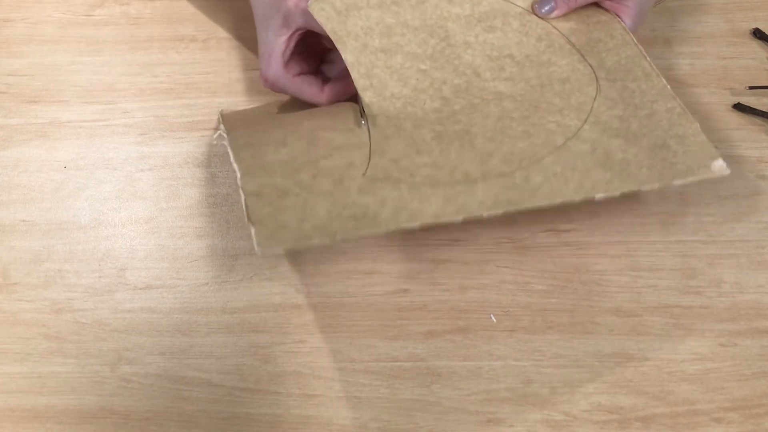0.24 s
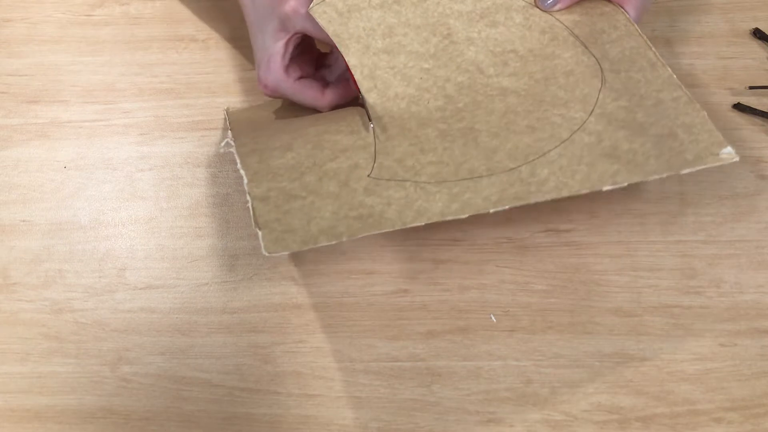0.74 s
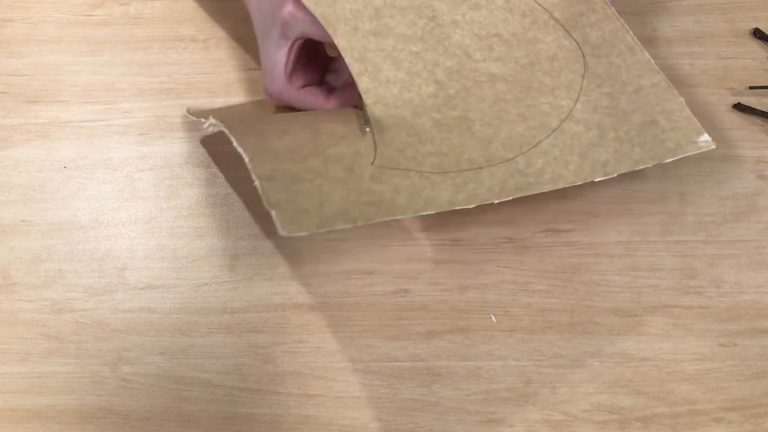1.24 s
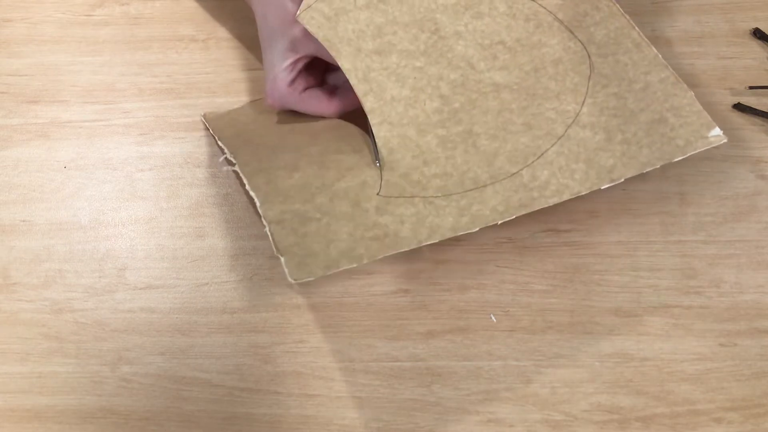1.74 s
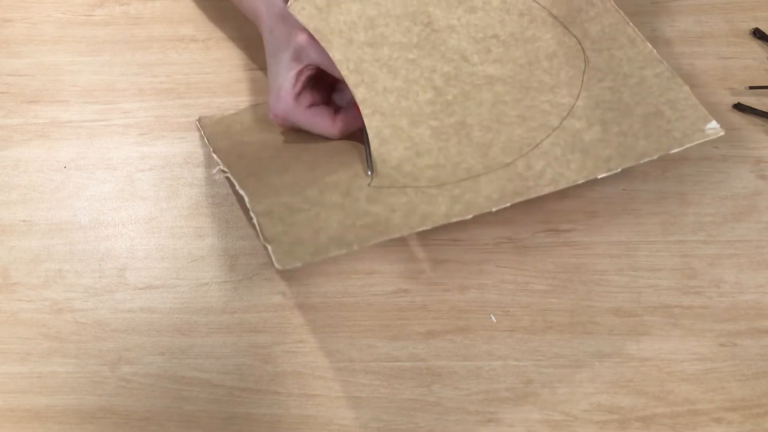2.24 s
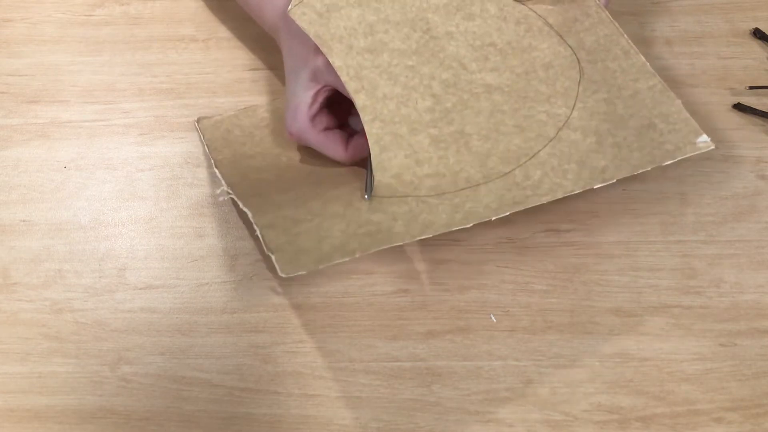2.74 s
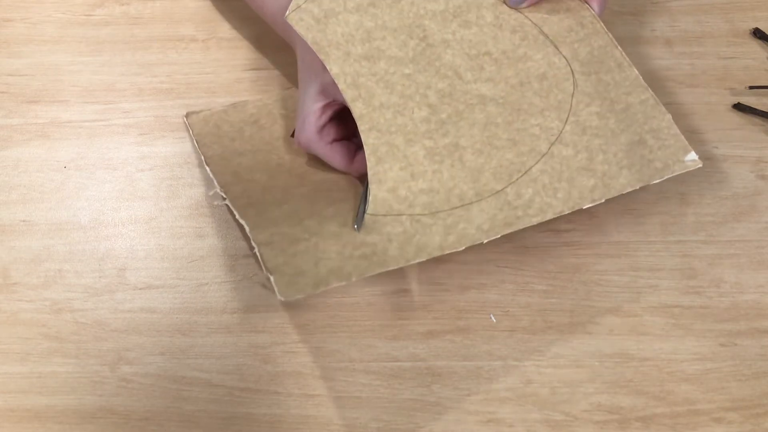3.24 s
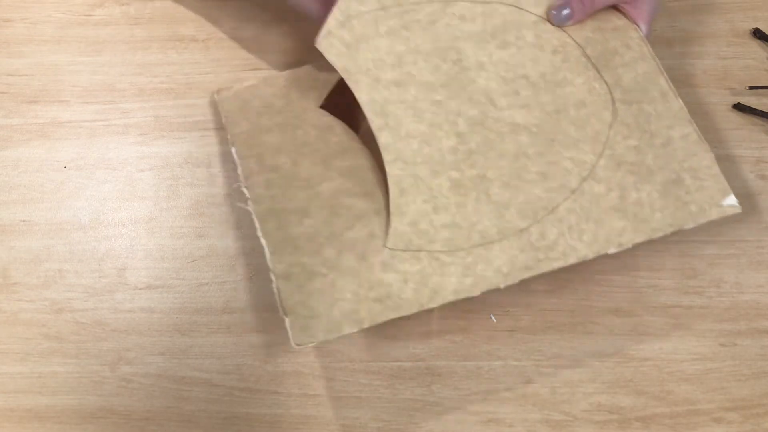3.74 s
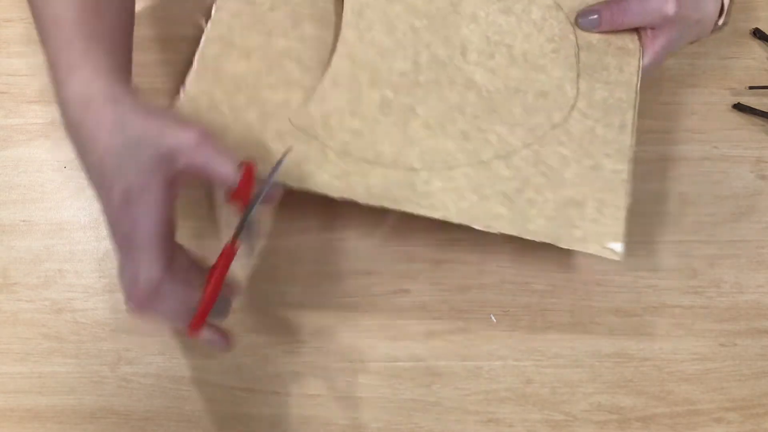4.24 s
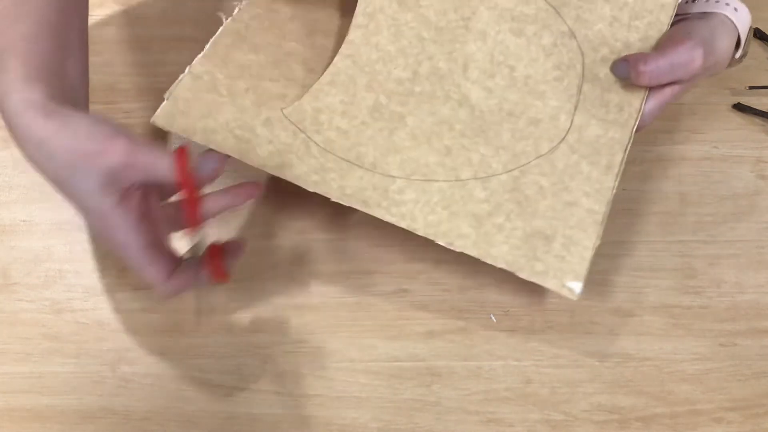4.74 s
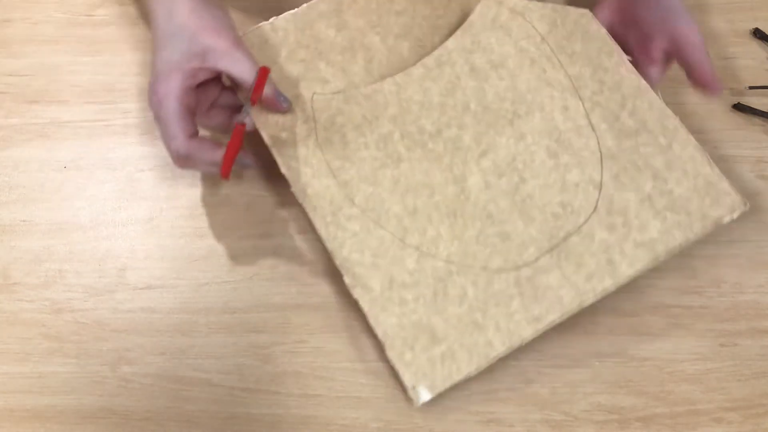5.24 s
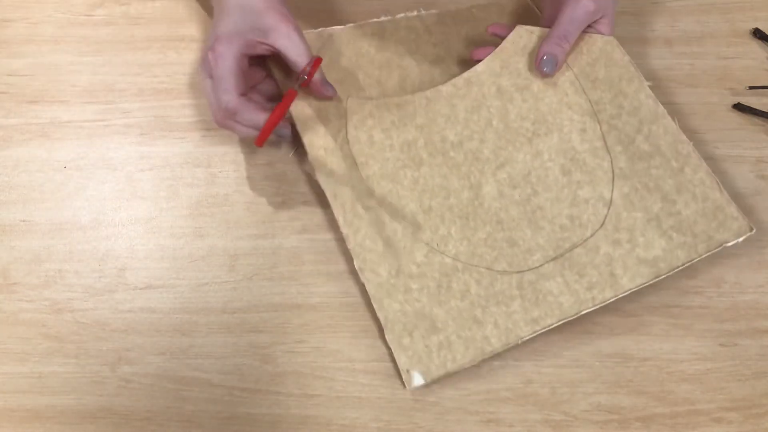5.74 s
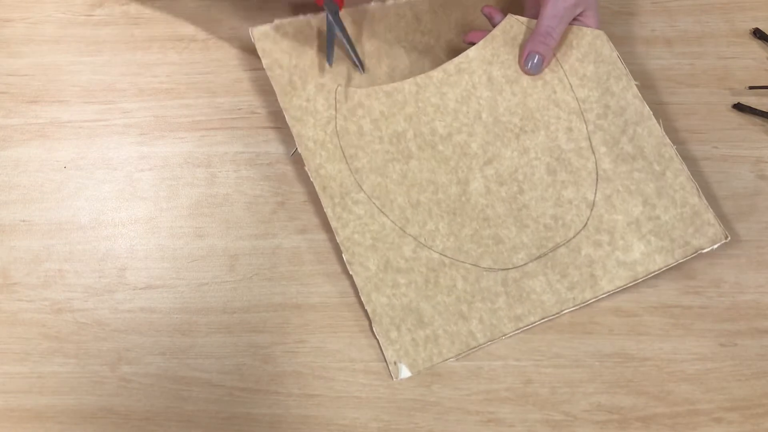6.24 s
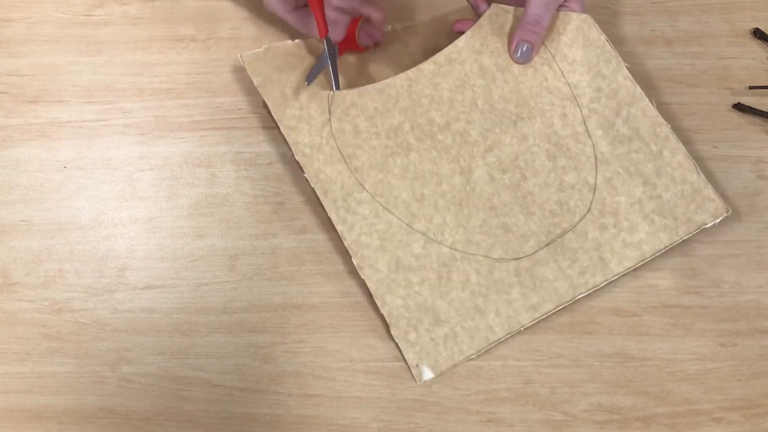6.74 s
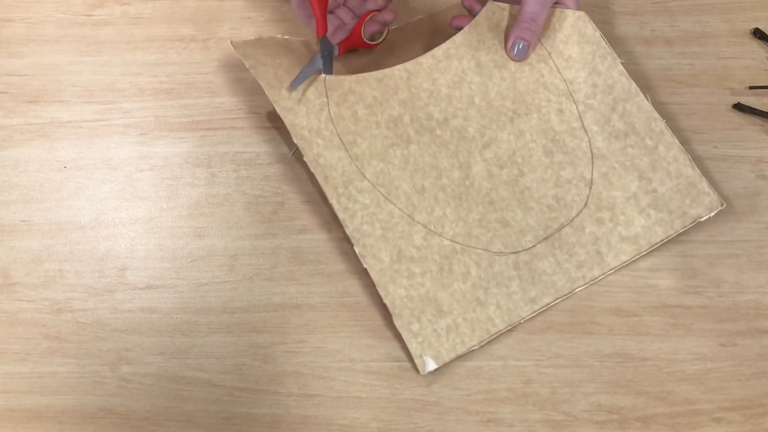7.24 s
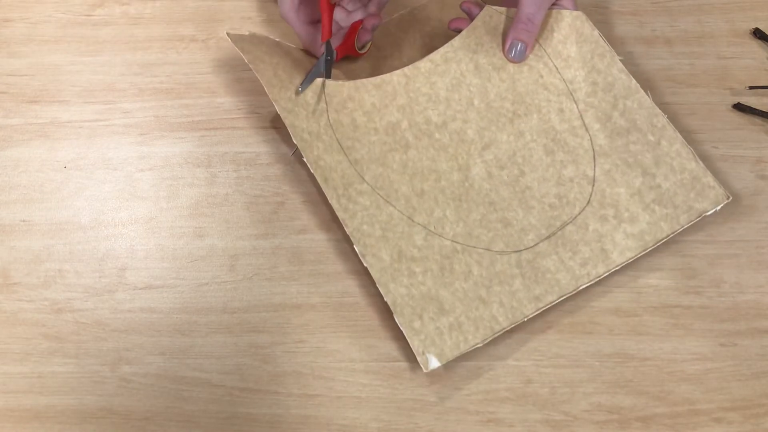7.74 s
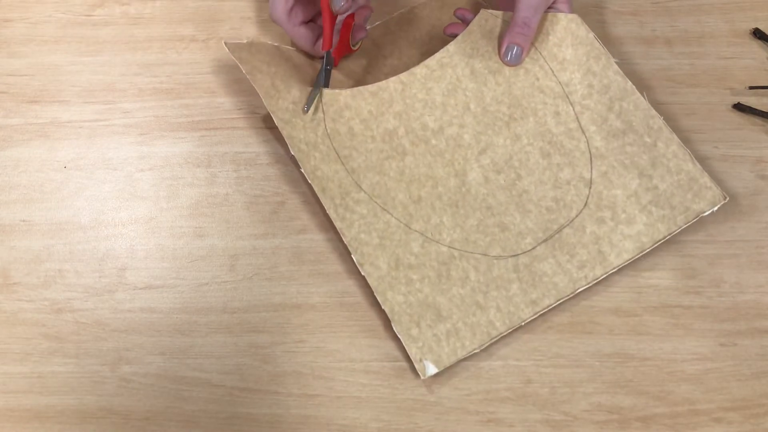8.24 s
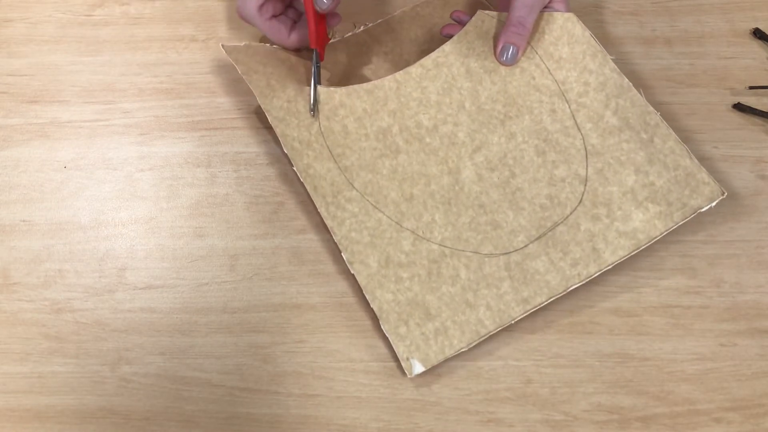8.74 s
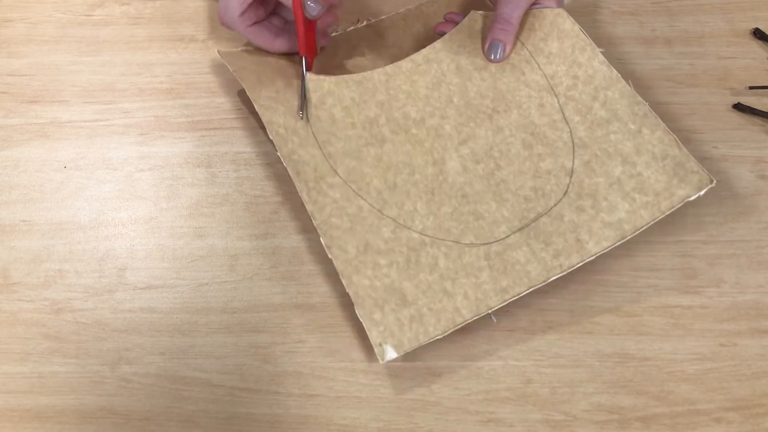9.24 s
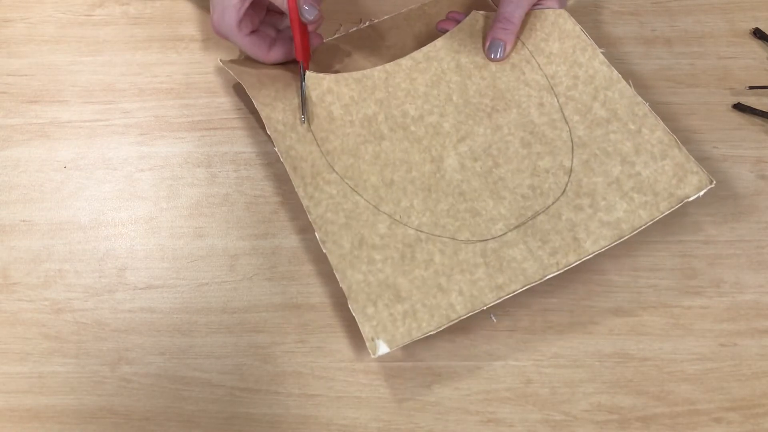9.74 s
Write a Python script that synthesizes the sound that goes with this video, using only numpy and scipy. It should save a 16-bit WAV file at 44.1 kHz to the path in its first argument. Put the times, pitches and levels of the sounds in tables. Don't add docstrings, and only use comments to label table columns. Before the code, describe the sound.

Small scissors crunch through thin cardboard in short crackling tears, with papery rubs, light taps and a brief squeak over faint ventilation rumble.

```python
import sys
import numpy as np
from scipy import signal
from scipy.fft import rfft, irfft, next_fast_len
from scipy.io import wavfile
from scipy.ndimage import uniform_filter1d

SR = 44100
rng = np.random.default_rng(int(sys.argv[2]) if len(sys.argv) > 2 else 0)


def put_to_file(sound):
    columns = np.atleast_2d(sound).T
    safe = np.clip(columns, -1, 1)
    whole_steps = np.round(safe * 32767)
    wavfile.write(sys.argv[1], SR, whole_steps.astype(np.int16))


def rack_gain(trim_db):
    fader = np.asarray(trim_db, float)
    return 10 ** (fader / 20)


N = 440118
SIZE = next_fast_len(N + SR // 2, True)
STEP = 32

# centre_hz, width_hz, level_db
FLAP_MODES = [(345, 64, -12), (447, 95, -7), (538, 186, -8.5)]
SHEET_MODES = [(695, 470, -6), (900, 280, 1), (1158, 520, -3.5), (1493, 330, -3.5)]
EDGE_MODES = [(1620, 660, 0), (2150, 524, -1.5), (2570, 350, -2.5), (3250, 1250, -5.5), (4200, 2040, -7)]
BLADE_MODES = [(5280, 390, -10), (7130, 1770, 5.5), (6700, 3700, 7), (10140, 2200, 2), (10850, 1000, 2.5),
               (13000, 19000, -0.5)]
# time_s, flap_db, ring_centre_hz, edge_tilt_db_per_octave
GRIP = [(0, 1.5, 880, 2), (1, 4, 914, -0.5), (1.6, 2, 762.5, 3), (2.3, 0, 870, 0.8), (3.12, 3.5, 841, 0),
        (3.3, 3.5, 1010, 0.5), (3.6, 1.5, 750, 1.5), (3.87, -2, 880, -1.5), (4.05, -7, 1153, 2),
        (5, 3.5, 1098, 3), (5.5, -15, 1250, 4.5), (6.3, -6.5, 1150, -2.5), (6.9, -9.5, 960, 0),
        (7.1, -8, 1000, -0.5), (7.3, -6, 1000, 4.5), (8.2, -8, 850, -4), (8.7, -5, 999, 1.5),
        (9.98, -12.5, 910, -1.5)]


def level(x, db):
    return x * rack_gain(db) / np.sqrt(np.mean(x ** 2))


def along(table, s):
    times, *columns = np.transpose(table)
    return [np.interp(s, times, column) for column in columns]


def held(control):
    return np.repeat(control, STEP)[:N]


def walk(rate_hz):
    hold = max(int(SR / STEP / rate_hz), 1)
    steps = np.repeat(rng.standard_normal(N // STEP // hold + 2), hold)
    return uniform_filter1d(uniform_filter1d(steps, hold), hold)[:N // STEP + 1]


def grit(shape, spread_db):
    return rng.standard_normal(shape) * rack_gain(spread_db * rng.exponential(size=shape))


def resonance(size, hz, width_hz):
    f = np.fft.rfftfreq(size, 1 / SR) + 1
    return 1 / (1 + 1j * (f - hz ** 2 / f) / width_hz)


def body(size, modes, shift=1, lean_db=0):
    lean_db = np.zeros(len(modes)) + lean_db
    total = 0
    for k, (hz, width_hz, db) in enumerate(modes):
        gain = (-1) ** k * rack_gain(db + lean_db[..., k:k + 1])
        total = total + gain * resonance(size, hz * shift, width_hz)
    return total


def skirts(size):
    return resonance(size, 2800, 4000), resonance(size, 8000, 13000)


def colour(x, response):
    size = 2 * response.shape[-1] - 2
    return irfft(rfft(x, size) * response, size)[..., :x.shape[-1]]


def tear_rows():
    # start_s, sheet_db, edge_over_sheet_db, length_ms
    blade_slips = [(.002, -35.5, -8, 4.8), (.024, -36.5, -5, 10), (.043, -32, -13.5, 8.3),
                   (0.048, -34, -8.5, 6.1), (.885, -40.5, -4.5, 17), (0.894, -46, -5, 16),
                   (.924, -35, -8.5, 4.1), (.935, -55, 9, 4), (.951, -32, -12, 5.7), (.963, -35.5, -5, 8.6),
                   (.999, -30.5, -9.5, 3.3), (1.027, -41, -2.5, 4.3), (1.082, -50.5, -7.5, 12),
                   (1.185, -49.5, -6, 11), (1.526, -40, -2, 6.7), (1.551, -36.5, -1.5, 6),
                   (1.568, -41, -4, 8.2), (1.589, -48, 4, 4.6), (1.604, -42.5, 3, 3.7),
                   (1.609, -35.5, -6.5, 4.3), (1.626, -38, -8, 6.7), (1.649, -32.5, -2.5, 6.3),
                   (1.67, -41.5, -6, 4.5), (1.69, -48, 3, 4.5),
                   (2.145, -46.5, -1, 4.9), (2.154, -40.5, -4, 5.5), (2.161, -43, -3.5, 4.8),
                   (2.179, -36.5, -4, 4.6), (2.186, -41, -1, 8), (2.198, -41, -8, 5.1),
                   (2.208, -38.5, -5.5, 10), (2.229, -42.5, -4, 6.4), (2.243, -54, 4, 2.8),
                   (2.253, -49.5, 6, 3.6), (2.284, -47, -1.5, 3), (2.601, -58, 5.5, 8.7),
                   (2.614, -42, -4, 9.6), (2.629, -44.5, 2, 11), (2.645, -44.5, 0, 7),
                   (2.654, -45, -0.5, 6.3), (2.664, -46, 0.5, 11), (2.678, -45, 0, 2.5),
                   (2.694, -37.5, -5.5, 8.8), (3.055, -55, 12, 8.9), (3.085, -50, 4, 4.3),
                   (3.1, -42.5, -2, 4.8), (3.126, -35.5, -1.5, 4.9), (3.134, -53, -4, 2.8),
                   (3.162, -39.5, -4.5, 4.1), (3.226, -46, 1, 3.4), (3.278, -30.5, -4, 9.5),
                   (3.338, -28.5, -3, 9.7), (3.518, -58, 8.5, 2.3),
                   (8.333, -48, -2.5, 8.4), (8.429, -55.5, 2.5, 4.5), (8.688, -45.5, 2, 11.4),
                  (8.762, -50.5, 2, 5.3), (8.804, -51, -2.5, 6.4), (8.84, -49.5, 1, 5.6),
                  (8.94, -39.5, -2, 9), (9.33, -46.5, -10.5, 12.4), (9.772, -53, 0, 11),
                  (9.805, -52, 0, 5.1), (9.823, -42.5, -1.5, 9.6), (9.839, -49, 1, 6.6),
                  (9.862, -53, 8, 5.4)]
    # start_s, sheet_db, edge_over_sheet_db, length_ms
    nicks = [(.034, -45, -1, 3.7), (.153, -64, 3, 3.3), (.491, -66.5, 5.5, 3), (.671, -69, 4, 3),
             (.818, -68, 4, 2), (3.072, -58, 4, 4.4), (3.214, -69, 7, 2), (3.859, -53, -3, 3),
             (4.41, -69, 5.5, 3), (4.585, -66.5, 3, 3), (4.667, -72, 6.5, 3), (5.235, -68.5, 2, 2),
             (5.525, -66, 1, 3.2), (6.489, -67, 2, 3), (6.52, -66, 10, 2), (6.528, -68, 8, 2),
             (6.733, -63, 5, 4), (6.834, -60, -1, 3), (7.154, -68.5, 4, 4), (7.309, -62, 5, 4.3),
             (7.417, -63, -1, 4), (8.387, -60, 1.5, 2), (8.665, -62, 2, 4.8)]
    # start_s, sheet_db, edge_over_sheet_db, length_ms, ring_hz
    knocks = [(.43, -48, -11.5, 7.9, 900), (.569, -48, -1, 3.3, 957), (.572, -35, -15, 9.2, 970),
              (2.733, -32, -4.5, 11.3, 900), (3.867, -36, -6.5, 7.9, 885), (3.872, -46, -11, 15, 560),
              (4.043, -42.5, -10.5, 4.3, 996), (4.239, -48.5, -5, 6.2, 960), (4.565, -55.5, -2.5, 13, 711),
              (4.981, -55.5, 11, 9, 640), (4.991, -44.5, -3.5, 3.5, 520), (4.997, -48.5, -14, 14, 480),
              (5.736, -49.5, -6.5, 9.1, 1280), (6.26, -37.5, -4, 2.6, 1280), (6.262, -49.5, -14, 7.1, 560),
              (6.268, -42.5, -5, 4.6, 1190), (6.425, -48, -7, 6.7, 1200), (6.777, -53, -1, 3.7, 1150),
              (6.884, -49, -6, 4, 980), (7.277, -41, -9, 6.3, 970), (8.208, -54.5, -4, 42, 606),
              (8.386, -54.5, 0.5, 34, 1040), (8.985, -49.5, -0.5, 10, 905), (9.033, -54, 2, 3.3, 900),
              (9.054, -44, -1.5, 1.5, 890), (9.059, -32.5, -7.5, 4.7, 1120), (9.096, -35.5, .4, 5.5, 960),
              (9.888, -38, -2, 5.5, 980)]
    # start_s, sheet_db, ring_hz
    taps = [(2.112, -55.5, 1670), (3.452, -61, 1000), (4.394, -62.5, 1210), (4.439, -49.5, 810),
            (4.51, -59, 1280), (4.552, -57, 810), (4.634, -57.5, 1203), (4.676, -63, 990),
            (4.808, -57, 900), (4.936, -61.5, 1300), (5.062, -59, 553), (8.104, -60, 640),
            (9.69, -55, 1720), (9.724, -57, 1760), (9.752, -60, 1720), (9.95, -54.5, 920),
            (6.325, -60, 1176)]
    slips = np.array(blade_slips + nicks)
    scatter = 1 + 0.058 * rng.standard_normal(len(slips))
    slip_ring_hz = along(GRIP, slips[:, 0])[1] * scatter
    tap_edge_db, tap_ms = -7, 6.1
    full_taps = np.array([(s, db, tap_edge_db, tap_ms, hz) for s, db, hz in taps])
    rows = np.vstack([np.column_stack([slips, slip_ring_hz]), np.array(knocks), full_taps])
    s, sheet_db, edge_db, length_ms, ring_hz = rows.T
    blades_under_edge_db = np.repeat([-12.5, -25, -11], [len(slips), len(knocks), len(taps)])
    crackle_db = sheet_db + edge_db
    fizz_db = crackle_db + blades_under_edge_db
    return np.array([s, sheet_db, ring_hz, crackle_db, fizz_db, length_ms])[:, :, None]


def tears(size=4096):
    s, sheet_db, ring_hz, crackle_db, fizz_db, length_ms = tear_rows()
    ms = np.arange(size) / SR * 1000
    run = np.exp(-.7 * ms / length_ms) / (1 + (ms / length_ms) ** 8)
    swell = 1 - np.exp(-ms / (.3 + .05 * length_ms))
    cracks = grit((len(s), size), spread_db=2.2) * swell
    flap_db, _, tilt_db = along(GRIP, s)

    bend = 1 + .035 * rng.standard_normal((len(s), 2, 1))
    lean_db = 2.2 * rng.standard_normal((len(s), len(EDGE_MODES + BLADE_MODES)))
    edge_lean_db, blade_lean_db = np.split(lean_db, [len(EDGE_MODES)], axis=1)

    sheet_lean_db = np.minimum(flap_db, 0) * (np.array(SHEET_MODES)[:, 0] < 800)
    sheet = rack_gain(-3) * body(size, SHEET_MODES, bend[:, 0], sheet_lean_db)
    sheet = sheet + 1.3 * resonance(size, ring_hz, 170)
    sheet = sheet * resonance(size, 806, 950) - rack_gain(flap_db) * body(size, FLAP_MODES)
    octaves = np.log2(np.array(EDGE_MODES)[:, 0] / 2600)
    edge = body(size, EDGE_MODES, bend[:, 1], edge_lean_db + tilt_db * octaves)
    blades = body(size, BLADE_MODES, 0.97, blade_lean_db)

    edge_skirt, blade_skirt = skirts(size)
    parts = [(sheet, sheet_db, .05), (edge * edge_skirt, crackle_db, .016),
             (blades * blade_skirt, fizz_db, .008)]
    out = np.zeros(N + size)
    for response, db, tail in parts:
        sound = colour(cracks * (run + tail * np.exp(-ms / 14)), response)
        energy = np.sum(sound ** 2, axis=1, keepdims=True) / (SR / 100)
        sound = sound * rack_gain(db) / np.sqrt(energy)
        np.add.at(out, (s * SR).astype(int) + np.arange(size), sound)
    return out[:N]


def stroke(t, start, length, first_db, last_db):
    steady_db = np.interp(t, [start, start + length], [first_db, last_db])
    start_db = 1300 * np.maximum(start - t, 0)
    stop_db = 552 * np.maximum(t - start - length, 0)
    return steady_db - start_db - stop_db


def pressure(t):
    # start_s, length_s, first_db, last_db, sheet_over_edge_db
    crush = [
        (0, 0.09, -55, -78, 11),
        (0.886, 0.15, -51, -58, 2.5),
        (1.065, 0.063, -61.5, -57.5, 2),
        (1.53, 0.16, -55, -58, 7),
        (2.148, .13, -60, -56.5, 7.5),
        (2.6, 0.097, -54.5, -55, 5.5),
        (3.064, 0.096, -59.5, -69, 10.5),
        (3.198, .2, -79, -65.5, 4.5),
        (9.403, 0.043, -59, -60, 5.5),
        (9.744, 0.15, -67, -49.5, 4),
    ]
    # start_s, length_s, first_db, last_db, sheet_over_edge_db
    slides = [(.15, 0.053, -62, -77.5, 1), (.232, .025, -48, -53.5, 1.5), (4.177, .04, -57.5, -68, -2),
              (0.289, 0.086, -46, -69, 0.5), (1.145, 0.14, -51.5, -57, -3.5), (1.88, .24, -44.5, -75, -4.5),
              (2.436, 0.12, -46, -59.5, -4), (2.857, 0.058, -44.5, -55.5, -5.5),
              (3.529, 0.077, -65, -41, -3), (4.444, 0.04, -55, -53, -1), (5.461, 0.13, -83, -58, 5.5),
              (5.76, 0.11, -60, -66, 3), (6.535, 0.035, -51, -48.5, -3), (6.892, .022, -53, -54, -7),
              (6.585, 0.1, -63, -61, -2), (6.749, 0.1, -57.5, -63.5, 1), (7.202, 0.04, -51, -50, -3),
              (7.24, .05, -58, -60, 0.5), (7.319, 0.084, -59.5, -59, -11), (8.4, 0.36, -63.5, -66, -11),
              (8.715, 0.06, -49, -70.5, 0), (9.246, 0.13, -46.5, -57.5, -1.5),
              (9.55, .12, -67.5, -66.5, -7)]
    # peak_s, fade_20_db_s, edge_db, sheet_over_edge_db, blades_over_edge_db
    brushes = [(0.21, 0.15, -61, 0, -7), (1.51, 0.06, -64.5, -1, -4.5), (3.09, .15, -66, -8, 8),
               (4.19, .07, -66, -6, 7), (4.26, .12, -68, -6, 7), (8.29, .3, -69, -2, -10),
               (9.51, .2, -69, 0, -8), (4.283, 0.1, -62, 0, 0.5), (4.64, 0.07, -63, 5, 0),
               (4.897, 0.03, -62.5, 0, -8), (5.26, 0.14, -70, 7.5, -7.5), (5.41, 0.05, -67, 7, -6),
               (5.73, 0.26, -70.5, 10, 3), (5.995, 0.18, -67, 2, -5.5), (6.34, 0.13, -63, 8.5, -11),
               (9.0, 0.7, -64, -8, -10), (7.06, 0.3, -64, -8, -5), (7.69, 0.23, -65, -11, -1)]
    # time_s, edge_db
    contact = [(.4, -66.5), (.81, -64), (.835, -79), (1.4, -78), (1.75, -71), (1.86, -66.5), (2.3, -71),
               (3.5, -75), (4.3, -77), (4.8, -84), (4.93, -74), (5.4, -84), (6.24, -78), (6.4, -61.5),
               (7.2, -67), (7.78, -74), (8.05, -81), (9.98, -69)]
    grid_s = np.arange(0, N / SR, .001)
    # edge level, then sheet and blades over the edge in dB
    moves = [(along(contact, grid_s)[0], -1, -8)]
    moves += [(stroke(grid_s, *row[:4]), row[-1], -9.5) for row in crush]
    moves += [(stroke(grid_s, *row[:4]), row[-1], -7.5) for row in slides]
    for s, fade_s, db, sheet_db, fizz_db in brushes:
        moves.append((db - 20 * abs(grid_s - s) / fade_s, sheet_db, fizz_db))
    power = 0
    for db, sheet_db, fizz_db in moves:
        power = power + rack_gain(2 * (db + np.array([[sheet_db], [0], [fizz_db]])))
    return [np.interp(t, grid_s, 10 * np.log10(p)) for p in power]


def rubbing():
    # centre_hz, width_hz, over_edge_db
    steel_modes = [(2030, 84, 3), (4230, 110, 1), (6500, 300, -1), (8600, 350, -2)]
    t = np.arange(N // STEP + 1) * STEP / SR
    sheet_db, scrape_db, fizz_db = pressure(t)
    flap_db, centre_hz, tilt_db = along(GRIP, t)
    stutter_db = 1.0 * walk(45) + 2.6 * walk(160) + 2.0 * walk(450)
    push = level(grit(N, spread_db=2.0) * held(rack_gain(stutter_db)), 0)

    def ring(db, response):
        signs = 2 * rng.integers(2, size=N, dtype=np.int8) - 1
        return rfft(push * signs * held(rack_gain(db)), SIZE) * response

    out = ring(sheet_db + flap_db + 21, body(SIZE, FLAP_MODES))
    for hz, width_hz, db in SHEET_MODES:
        share_db = db - 45 * np.log2(hz / centre_hz) ** 2 + 3.2 * walk(30)
        out += ring(sheet_db + share_db + 17, resonance(SIZE, hz, width_hz) ** 2)
    for hz, width_hz, db in EDGE_MODES:
        share_db = db + tilt_db * np.log2(hz / 2600) + 2.2 * walk(18)
        out += ring(scrape_db + share_db + 11.0, resonance(SIZE, hz, width_hz) ** 2)
    blade_skirt = skirts(SIZE)[1]
    for hz, width_hz, db in BLADE_MODES:
        share_db = db + 4.5 * walk(16)
        out += ring(fizz_db + share_db - 4.5, resonance(SIZE, hz, width_hz) * blade_skirt)
    for hz, width_hz, db in steel_modes:
        out += ring(scrape_db + db + 3.8 * walk(6), resonance(SIZE, hz, width_hz) ** 2)
    slow = irfft(ring(sheet_db + 22, resonance(SIZE, 1, 107) ** 2), SIZE)[:N]
    ridge = slow * np.cos(2 * np.pi * np.cumsum(held(centre_hz)) / SR)
    return irfft(out, SIZE)[:N] + ridge


def ventilation():
    # frequency_hz, level_db (per Hz)
    air_spectrum = [(21, -37), (28, -19), (36, -10.5), (86, -3.5), (349, -26), (611, -35.5), (3550, -52.5),
                    (16000, -57)]
    hz, db = np.transpose(air_spectrum)
    log_hz = np.log(np.fft.rfftfreq(SIZE, 1 / SR) + 1)
    air = colour(rng.standard_normal(N), rack_gain(np.interp(log_hz, np.log(hz), db)))
    mode = colour(rng.standard_normal(N), resonance(SIZE, 68.06, 6.7) ** 2)
    return level(air, -51) + level(mode, -53.5)


def singing():
    # start_s, length_s,
    # first_hz, last_hz, level_db
    sings = [(.15, 0.065, 3350, 3200, -60), (.27, .05, 3100, 2800, -56), (0.298, .06, 6400, 6200, -64),
             (.3, 0.055, 9000, 8900, -67), (0.438, .16, 3300, 3100, -70), (.45, .07, 7500, 7700, -74),
             (.45, .07, 6400, 6400, -73), (0.598, 0.19, 3300, 3180, -68), (.72, .09, 6600, 6500, -72),
             (1.08, .05, 3200, 3250, -62), (1.08, .08, 4380, 4400, -67),
             (1.88, 0.064, 1800, 1800, -56), (1.881, .08, 2700, 2650, -56),
             (1.88, .07, 3190, 3150, -58), (1.89, .07, 4200, 4100, -62), (1.9, .1, 1173, 1170, -56),
             (1.78, .08, 1600, 1900, -64), (2.441, .12, 4100, 4120, -58),
             (2.852, .055, 6970, 6900, -54), (2.855, .055, 5700, 5700, -55),
             (3.461, .07, 3500, 3650, -70), (4.17, .04, 1250, 1250, -63), (4.44, .04, 1820, 2000, -56),
             (4.462, .06, 1250, 1280, -57), (4.63, 0.023, 1247, 1150, -59),
             (5.24, 0.056, 3200, 3200, -70), (5.55, 0.064, 3250, 3210, -65),
             (5.75, .12, 3350, 3250, -66), (5.88, 0.13, 3290, 3240, -71), (5.76, .09, 5360, 5500, -68),
             (5.77, .06, 6790, 7100, -71), (5.8, 0.075, 1700, 1750, -64),
             (6.535, .045, 2050, 2100, -47), (6.535, 0.041, 1220, 1216, -47),
                  (6.53, .045, 5450, 5500, -56), (6.54, .04, 3150, 3150, -59),
                  (7.2, 0.044, 3500, 3500, -58), (7.305, .03, 3400, 3100, -63),
                  (7.35, .06, 3500, 3900, -62), (7.35, .05, 2400, 2400, -63), (8.42, .07, 4400, 4400, -68),
                  (8.44, 0.2, 1900, 2100, -67), (8.5, .16, 3100, 4100, -71), (8.72, .04, 2500, 2494, -61),
                  (9.57, .09, 4100, 3900, -67), (9.69, .045, 2100, 2100, -61), (9.75, .07, 1720, 1690, -57),
                  (9.76, .12, 2110, 2050, -58)]
    out = np.zeros(N)
    for s, length_s, first_hz, last_hz, db in sings:
        n = int(length_s * SR)
        reach = int(SR * 14 / first_hz / 2)
        slow = uniform_filter1d(grit((2, SR // 4), spread_db=3.5), reach)
        slow = uniform_filter1d(slow, reach // 2)[:, :n]
        turn = 2 * np.pi * np.cumsum(np.linspace(first_hz, last_hz, n)) / SR
        tone = slow[0] * np.cos(turn) + slow[1] * np.sin(turn)
        swell = np.sin(np.linspace(0, np.pi, n)) ** .5
        out[int(s * SR):int(s * SR) + n] += level(tone * swell, db - 4)
    return out


def squeak():
    # time_s, level_db
    drag = [
        (3.66, -61.5),
        (3.715, -37.5),
        (3.775, -50.5),
        (3.79, -76),
    ]
    # centre_hz, width_hz, level_db
    bands = [(890, 125, -1.5), (1480, 420, -3), (1600, 1800, -9), (3290, 600, -8), (4100, 360, -12),
             (5900, 1200, -13), (8260, 800, -18)]
    t = np.arange(N) / SR
    drag_db = along(drag, t)[0] + held(4 * walk(70)) + 14
    push = level(grit(N, spread_db=1.4), 0) * rack_gain(drag_db)
    push = push * (abs(t - drag[1][0]) < .1)
    return colour(push, sum(rack_gain(db) * resonance(SIZE, hz, width_hz) ** 2 for hz, width_hz, db in bands))


def small_knocks():
    tick_times = [7.572, 7.631, 7.683, 7.708, 7.755, 7.792]
    thud_times = [8.108, 8.212]
    thuds, ticks = np.zeros((2, N))
    thuds[(np.array(thud_times) * SR).astype(int)] = rack_gain(7.5)
    ticks[(np.array(tick_times) * SR).astype(int)] = rack_gain(-40)
    table_top = body(SIZE, [(132.6, 13.5, 6.0), (403, 140, -21.5)])
    return colour(thuds, table_top) + colour(ticks, resonance(SIZE, 6300, 13000))


def room(x):
    t60_s, tail_db, dull_hz = 0.11, -10.5, 3550
    t = np.arange(SR // 2) / SR
    echo = rng.standard_normal(SR // 2) * np.exp(-np.log(1000) * t / t60_s) * (t > .004)
    dull = 1 / (1 + 1j * np.fft.rfftfreq(SIZE, 1 / SR) / dull_hz)
    return colour(x, rfft(echo, SIZE) * dull) * rack_gain(tail_db) / np.sqrt(np.sum(echo ** 2))


def scene():
    cutting = tears() + rubbing() + singing() + squeak() + small_knocks()
    return (cutting + room(cutting) + ventilation())[None]


def low_pass(x):
    return signal.sosfilt(signal.butter(12, 16780, fs=SR, output="sos"), x)


def record(dry):
    notches = (1 - .5 * resonance(SIZE, 4950, 600)) * (1 - .6 * resonance(SIZE, 10450, 800))
    top = signal.ellip(8, .2, 20, 15750, fs=SR, output="sos")
    mix = signal.sosfilt(top, colour(dry, notches))
    return low_pass(mix)


dry = scene()
out = record(dry)
put_to_file(out)
```